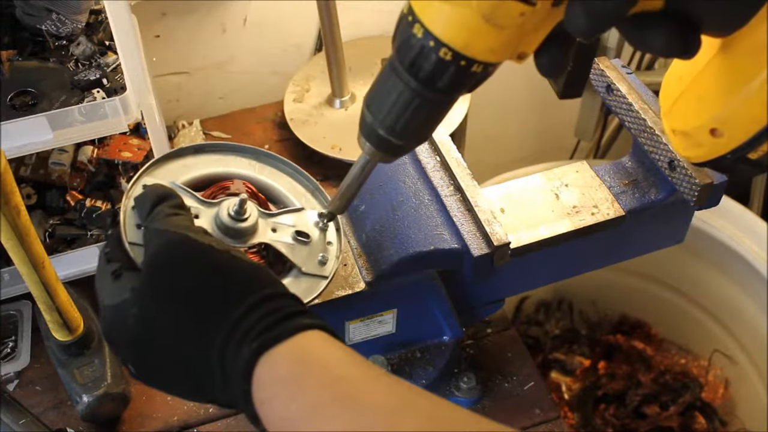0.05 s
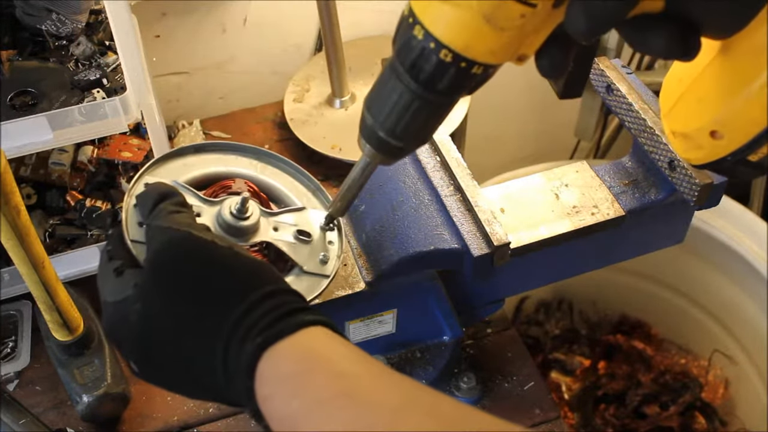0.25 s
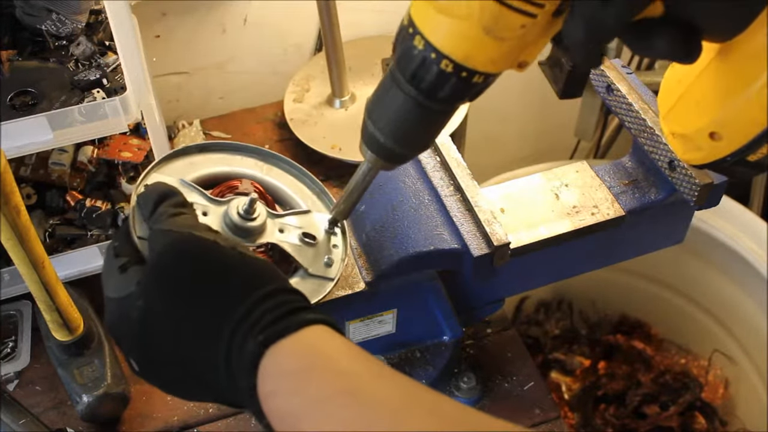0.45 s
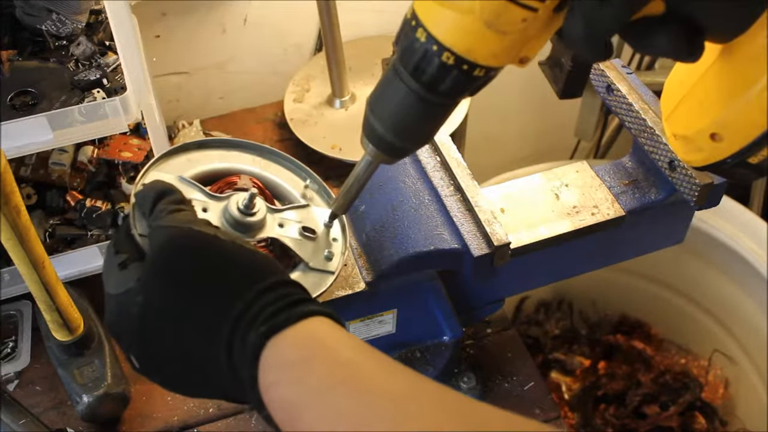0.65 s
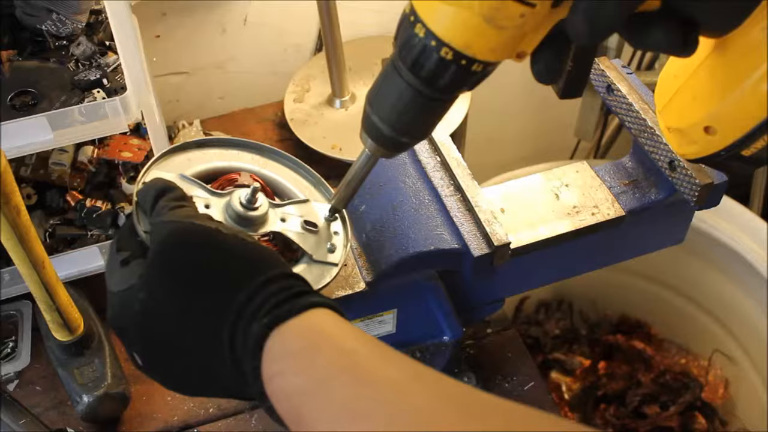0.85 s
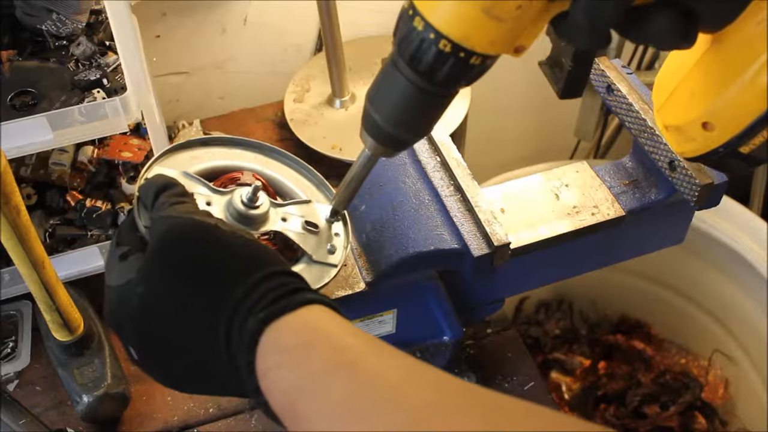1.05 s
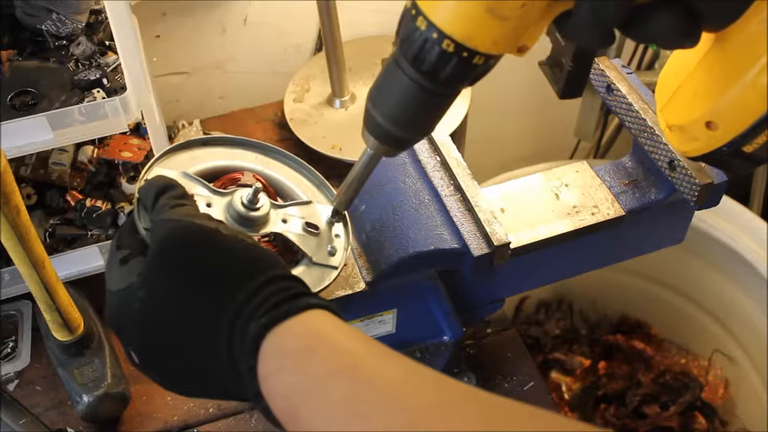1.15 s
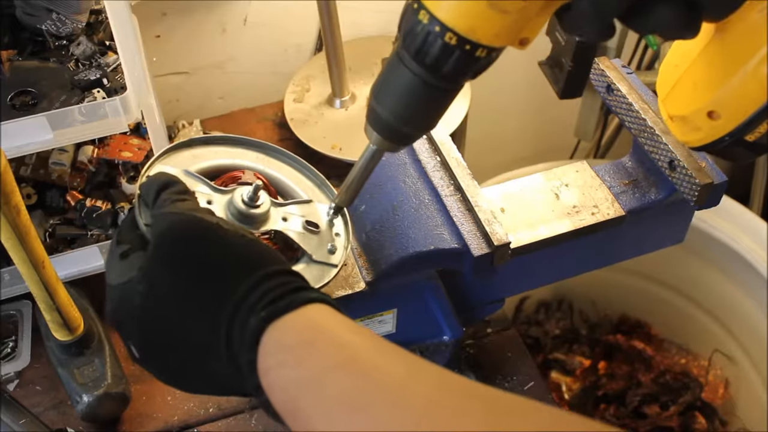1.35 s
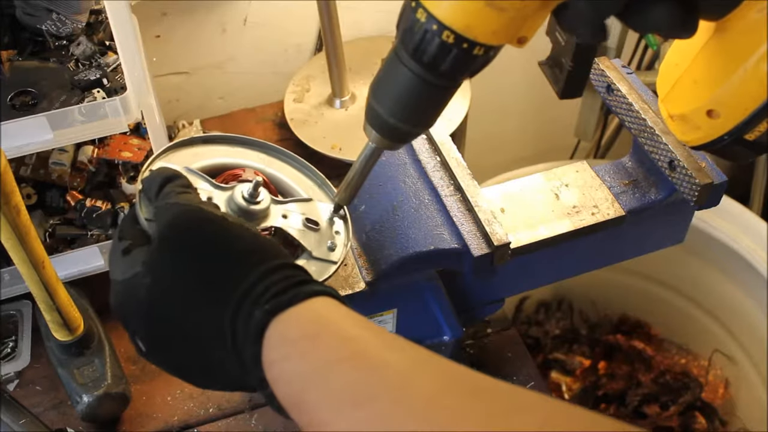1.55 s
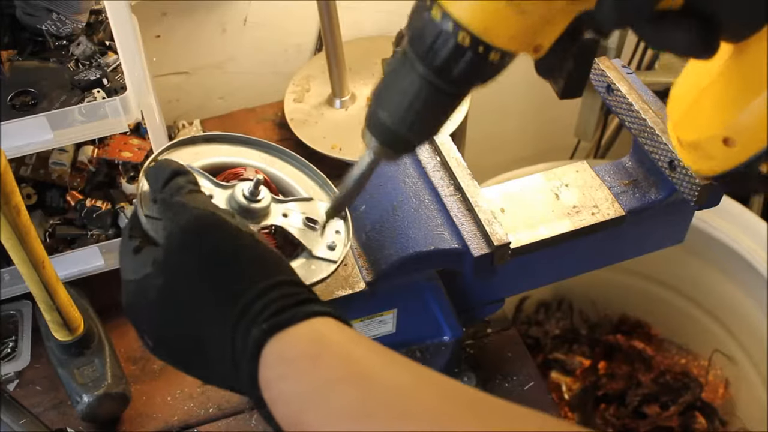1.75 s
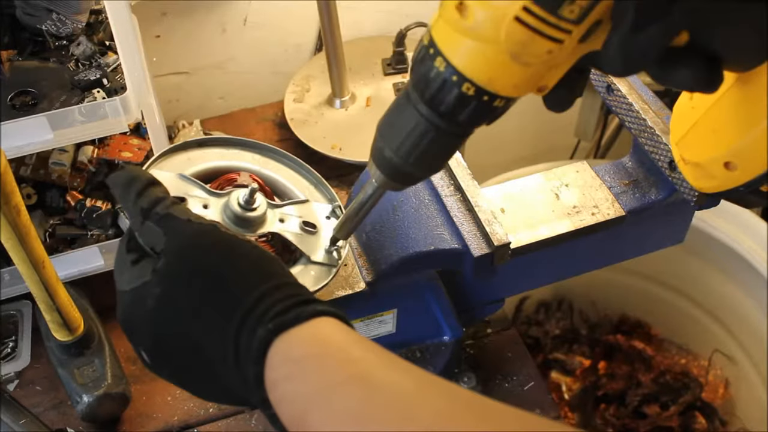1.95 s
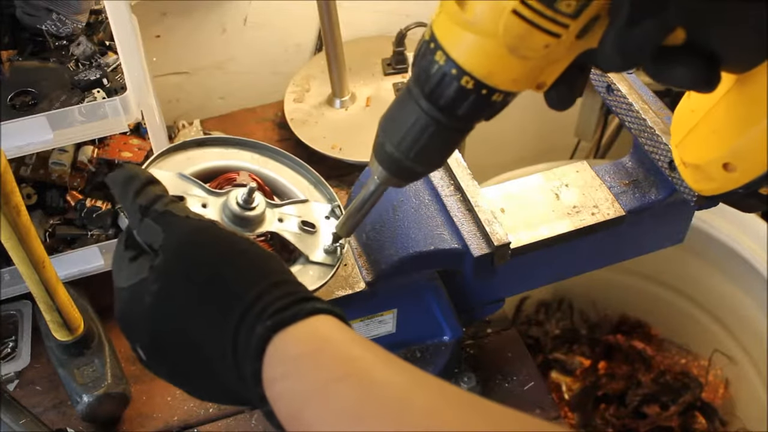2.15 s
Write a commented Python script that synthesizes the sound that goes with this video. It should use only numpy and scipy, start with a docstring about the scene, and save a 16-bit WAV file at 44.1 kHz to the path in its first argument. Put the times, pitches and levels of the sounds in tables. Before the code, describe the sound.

After a few clicks and a faint distant bird chirp, a cordless drill chatters against a screw, eases off, then spins up with a gear whine and brakes. The bit clicks and rubs on metal, close at a workbench.

```python
"""A cordless drill works on a screw in a motor housing, close by at a workbench in a small workshop.
Its gears rattle and whine; the bit scrapes and slips in the screw head about 68 times a second,
ringing the housing. The drill slows, spins up freely and brakes with a clack; the bench booms under it.
The bit clicks and rubs on the metal before and after. A distant bird chirps over a faint hum."""
import sys
import numpy as np
from scipy import signal
from scipy.fft import rfft, irfft
from scipy.io import wavfile
from scipy.ndimage import uniform_filter1d, map_coordinates

SR = 44100
rng = np.random.default_rng(int(sys.argv[2]) if len(sys.argv) > 2 else 0)


def transcribe(u):
    """Save the signal u as a 16-bit wav file named by the first command-line argument.

    u: samples, shape (n,) or (channels, n), limited to [-1, 1]; the rate is SR.
    q: integer samples, one column per channel.
    """
    v = np.clip(np.atleast_2d(u).T, -1, 1)
    q = np.round(v * 32767).astype(np.int16)
    wavfile.write(sys.argv[1], SR, q)


N = 97020


def amp(db):
    return 10 ** (np.asarray(db) / 20)


def unit(x):
    """Scale to rms 1."""
    return x / np.sqrt(np.mean(x ** 2) + 1e-20)


def clock():
    return np.arange(N) / SR


def curve(rows):
    """Linear interpolation of (time [s], value)."""
    return np.interp(clock(), *np.array(rows).T)


def gain(rows):
    """Gain from (time [s], level [dB]); zero outside the rows."""
    t = clock()
    return amp(curve(rows)) * (t > rows[0][0]) * (t < rows[-1][0])


def noise():
    return rng.standard_normal(N)


def walk(rate_hz):
    """Smooth random drift, rms 1."""
    width = max(int(SR / rate_hz), 1)
    return unit(uniform_filter1d(uniform_filter1d(noise(), width), width))


def colour(x, points):
    """Minimum-phase filter from (frequency [Hz], gain [dB]), scaled to unit noise gain."""
    size = 8192
    hz, db = np.array(points, float).T
    bin_hz = np.arange(size // 2 + 1) * SR / size
    magnitude = unit(amp(np.interp(np.log(bin_hz + 1), np.log(hz), db)))
    cepstrum = irfft(np.log(magnitude))
    cepstrum[1:size // 2] *= 2
    cepstrum[size // 2 + 1:] = 0
    return signal.fftconvolve(x, irfft(np.exp(rfft(cepstrum))))[:N]


def ring(x, modes):
    """Drive damped modes, scaled to unit noise gain."""
    t = clock()[:SR // 4]
    response = sum(amp(db) * np.sqrt(width) * np.exp(-np.pi * width * t) * np.cos(2 * np.pi * hz * t)
                   for hz, width, db in modes)
    return signal.fftconvolve(x, response / np.linalg.norm(response))[:N]


def echo(x, t60_s):
    """Diffuse reflections after a 4 ms gap."""
    t = clock()
    response = noise() * amp(-60 * t / t60_s) * (t > .004)
    return signal.fftconvolve(x, response / np.linalg.norm(response))[:N]


def blows(times, dbs, decay_s):
    """Envelope: a jump at each blow, then exponential decay."""
    kicks = np.zeros(N)
    kicks[(np.asarray(times) * SR).astype(int)] = amp(dbs) ** 2
    return np.sqrt(signal.lfilter([1], [1, -np.exp(-2 / (decay_s * SR))], kicks + 1e-18))


def strike(times, dbs, scuff_s=.0007):
    """Hard contact force: an impulse plus a brief scuff."""
    force = .5 * blows(times, dbs, scuff_s) * noise()
    force[(times * SR).astype(int)] += amp(dbs) * np.sqrt(scuff_s * SR / 2)
    return force


def scatter(pulses, spread_db):
    """Randomise pulse level and sign."""
    return pulses * amp(spread_db * np.clip(noise(), -2, 2)) * np.sign(noise())


def grit(catches_per_s=1800):
    """Friction: dense tiny catches, rms 1."""
    return unit(scatter(rng.random(N) < catches_per_s / SR, spread_db=2))


def glide(start_s, length_s, start_hz, end_hz, db, waver):
    """Wavering tone that swells, slides in pitch and fades."""
    progress = np.clip((clock() - start_s) / length_s, 0, 1)
    hz = (start_hz + (end_hz - start_hz) * progress) * (1 + waver * walk(1086))
    return amp(db) * np.sqrt(2) * np.sin(np.pi * progress) * np.sin(2 * np.pi * np.cumsum(hz) / SR)


# Workshop hush spectrum (frequency [Hz], relative gain [dB])
HUSH_COLOUR = [(30, -14), (296, 1), (404, -7.5), (2370, -8.5), (3500, -8), (4420, -11.5), (15000, -42)]


def background(hum_hz=120.3, hum_db=-59.5, hush_db=-53.5):
    """Low hum and workshop hush; both fade, the hum more."""
    fade_db = curve([(.35, 0), (2, -10)])
    hum = amp(hum_db + fade_db + .5 * walk(30)) * np.sqrt(2) * np.sin(2 * np.pi * hum_hz * clock())
    hush = amp(hush_db + fade_db / 2) * colour(noise(), HUSH_COLOUR)
    return hum + hush


# Bird chirps (time [s], length [s], start pitch [Hz], end pitch [Hz], level [dB])
BIRD_CHIRPS = [(0.115, 0.05, 5320, 4800, -49), (0.145, 0.066, 4200, 3300, -38),
               (0.167, 0.048, 4500, 4480, -38), (0.207, 0.04, 3050, 2750, -37.5),
               (0.232, .05, 3000, 3650, -40), (.355, 0.03, 3200, 3430, -43), (1.745, 0.07, 5490, 4350, -53),
               (1.808, 0.03, 3150, 3400, -49)]


def bird(flutter_db=3.5):
    """Short, rough, fluttering glides, smeared by distance."""
    song = sum(glide(*chirp, waver=.033) for chirp in BIRD_CHIRPS) * amp(flutter_db * walk(180))
    return song + echo(song, t60_s=.7)


# Bench vibration (time [s], level [dB])
BENCH_LEVEL = [(.46, -71), (.5, -46), (.63, -54.5), (.72, -40), (.785, -54), (.9, -43), (1.03, -53.5),
               (1.37, -54), (1.64, -55), (1.69, -78)]
# Bench modes (frequency [Hz], width [Hz], relative level [dB])
BENCH_RESONANCES = [(151.7, 12.5, 6.5), (266, 18, 2)]


def bench(band_hz=(63.5, 380)):
    """Drill vibration booms in the low modes of the bench."""
    band = signal.butter(3, band_hz, "bandpass", fs=SR, output="sos")
    boom = signal.sosfilt(band, ring(noise(), BENCH_RESONANCES))
    return unit(boom) * gain(BENCH_LEVEL)


# Rubbing strokes (time [s], length [s], level [dB])
RUB_STROKES = [(0.047, 0.45, -55.5), (1.865, 0.15, -47), (1.972, 0.25, -55.5)]
# Metal contact spectrum, also for slips (frequency [Hz], relative gain [dB])
CONTACT_COLOUR = [(400, -5.5), (2500, -6), (11000, -1), (16000, 0)]
# Housing modes, also for taps and slips (frequency [Hz], width [Hz], relative level [dB])
HOUSING_MODES = [(507, 23, -9), (1000, 53, -12.5), (1457, 75, 4), (1700, 48, 0), (2800, 170, 4.5),
                 (3070, 71, 1)]


def handling(flutter_db=3.9):
    """Gloves and bit rub the housing and ring it; the sliding bit squeaks once."""
    strokes = sum(amp(db) * np.sin(np.pi * np.clip((clock() - start_s) / length_s, 0, 1))
                  for start_s, length_s, db in RUB_STROKES)
    rub = grit() * strokes * amp(flutter_db * walk(68))
    squeak = glide(start_s=1.88, length_s=.11, start_hz=1620, end_hz=1820, db=-47, waver=.031)
    return colour(rub, CONTACT_COLOUR) + amp(-5) * ring(rub, HOUSING_MODES) + squeak


# Bit taps (time [s], force level [dB], contact cutoff [Hz])
BIT_TAPS = [(0.0932, -25, 2100), (1.4115, -17.5, 2000), (1.5165, -15, 2000), (2.1715, -25.5, 3600)]


def taps():
    """The bit taps the housing; softer contact drives the high modes less."""
    force = 0
    for time_s, db, cutoff_hz in BIT_TAPS:
        contact = strike(np.array([time_s]), np.array([db]))
        force += signal.lfilter(*signal.butter(2, cutoff_hz, fs=SR), contact)
    return ring(force, HOUSING_MODES)


def burst(times, dbs, spectrum, decay_s):
    """Impact noise: fast decay plus a short rattling tail."""
    tail = blows(times, dbs - 15, decay_s=.01)
    envelope = np.hypot(blows(times, dbs, decay_s), tail)
    return colour(envelope * noise(), spectrum)


# Knocks of bit, trigger and chuck (time [s], snap level [dB], body level [dB])
KNOCKS = [(0.0651, -26.5, -55), (0.285, -22, -36.5), (0.4605, -20, -21), (0.9996, -44, -27),
          (1.008, -19, -22), (1.6616, -15.5, -21.5), (1.8385, -25, -31.5), (1.842, -25, -29),
          (1.936, -20.5, -34.5), (1.948, -22, -36.5), (2.1729, -27, -35)]
# Bumps into the bench (time [s], level [dB])
BUMPS = [(1.006, -33), (1.412, -37.5), (1.468, -39), (1.523, -40), (1.577, -40), (1.842, -36.5)]
# Snap, body and bump spectra (frequency [Hz], relative gain [dB])
KNOCK_SNAP_COLOUR = [(500, -10), (2500, -19), (8500, -1.5), (15000, 0.5)]
KNOCK_BODY_COLOUR = [(200, -46.5), (500, -3), (850, -10), (1400, 1.5), (2100, -8), (4500, -4),
                     (7000, -20.5), (15000, -65)]
BUMP_COLOUR = [(35, -34), (75, -11), (150, 7), (205, -10), (285, 6), (420, -9), (4000, -40)]


def knocks():
    """Bit, trigger and chuck knock with a bright snap and hollow body; bumps thud through the bench."""
    times, snap_db, body_db = np.array(KNOCKS).T
    snap = burst(times, snap_db, KNOCK_SNAP_COLOUR, decay_s=.004)
    body = burst(times, body_db, KNOCK_BODY_COLOUR, decay_s=.0041)
    thud = burst(*np.array(BUMPS).T, BUMP_COLOUR, decay_s=.02)
    return snap + body + thud


# Scrape envelope (time [s], level [dB])
SCRAPE_LEVEL = [(.455, -37.5), (.5, -28), (.62, -33.5), (.87, -30.5), (.915, -44), (.99, -43.5),
                (1.11, -37.5), (1.62, -45), (1.72, -53)]
# Scrape spectrum (frequency [Hz], relative gain [dB])
FRICTION_COLOUR = [(120, -43.5), (200, -13), (277, -8.5), (680, -5), (1070, -2), (1470, 0.5), (2860, -3),
                   (6000, -10.5), (9000, -68)]
# Slot jumps (time [s], relative crack level [dB], relative ring level [dB])
BIT_SLIPS = [(.4777, -15.5, -22), (.514, -15, -23), (.5216, -21, -29), (.5405, -21, -15),
             (.561, -18.5, -18.5), (.578, -15, -17), (.5945, -20, -17.5), (.609, -26, -24),
             (.626, -21, -21), (.642, -17.5, -23.5), (.658, -19.5, -22.5), (.687, -19.5, -19.5),
             (.7, -20, -28), (.7156, -19.5, -16.5), (.731, -29, -22.5), (.7438, -17, -22), (.759, -22, -29),
             (.772, -31, -21.5), (.786, -17.5, -25), (.8, -23, -23.5), (.8135, -19, -18.5),
             (.8285, -23, -31), (.8435, -17.5, -21.5), (.876, -21.5, -19.5), (1.012, -25, -21.5)]


def bit():
    """The bit scrapes in the screw head and jumps slots; each jump ticks, cracks and rings the housing."""
    scrape = colour(grit() * gain(SCRAPE_LEVEL), FRICTION_COLOUR)
    times, crack_db, ring_db = np.array(BIT_SLIPS).T
    tick = blows(times, crack_db - 2.5, decay_s=.00076)
    crack = np.hypot(tick, blows(times, crack_db, decay_s=.0054)) * noise()
    housing = ring(strike(times, ring_db + 6.5), HOUSING_MODES)
    return scrape + housing + colour(crack, CONTACT_COLOUR)


# Gear rattle spectrum (frequency [Hz], relative gain [dB])
RATTLE_COLOUR = [(150, -33), (278, -23), (668, -20.5), (1100, -15), (1330, -2), (1680, -6.5), (1950, -9.5),
                 (3050, -8.5), (3480, -4), (4300, -5), (4720, -1), (5150, -8.5), (5650, -6.5), (6400, -1),
                 (8950, -3.5), (9650, .5), (12500, -5), (15800, -7)]


def gear_rattle(turns, teeth=12, cycle_turns=4, turn_depth=.16, flutter_db=1):
    """Gear teeth clatter, partly at random, partly in a repeating wear pattern."""
    impacts = scatter(np.diff(np.floor(turns * teeth), prepend=0), spread_db=5.5)
    wear = rng.standard_normal(560)
    pattern = map_coordinates(wear, [turns / cycle_turns % 1 * len(wear)], mode="grid-wrap")
    surge = (1 + turn_depth * np.cos(2 * np.pi * turns)) * amp(flutter_db * walk(170))
    clatter = unit(unit(impacts) + .53 * noise())
    return colour(unit((clatter + 1.05 * pattern) * surge), RATTLE_COLOUR)


# Gear throb and whines (order [x motor speed], relative level [dB], peak at [rev/s], spread [rev/s])
GEAR_ORDERS = [(.25, -24.5, 276, 14), (4, -17, 338, 14), (5, -13, 301, 11), (10.1, -16.5, 342, 3.5),
               (16.85, -18.5, 353, 7), (20, -8.5, 331, 7.5), (20, -11, 354, 2.5), (20, -12, 220, 38)]


def gear_whine(speed_rps, turns, flutter_db=2.5):
    """Gear tones swell as the speed passes resonances of the case."""
    whine = 0
    for order, db, peak_rps, spread_rps in GEAR_ORDERS:
        resonance = np.exp(-.5 * ((speed_rps - peak_rps) / spread_rps) ** 2)
        tone = np.sqrt(2) * np.sin(2 * np.pi * order * turns)
        whine += amp(db + flutter_db * walk(44)) * resonance * tone
    return whine


# Motor speed (time [s], speed [rev/s])
MOTOR_SPEED = [(.45, 235), (.62, 275), (.88, 280), (.96, 130), (1.01, 165), (1.1, 298), (1.19, 325),
               (1.28, 338), (1.42, 347.5), (1.61, 354), (1.657, 344), (1.7, 90)]
# Gear envelope (time [s], level [dB])
GEAR_LEVEL = [(.455, -86), (.485, -28.5), (.55, -26.5), (.62, -31), (.88, -32), (.912, -43.5), (.995, -40),
              (1.012, -27.5), (1.12, -24), (1.66, -25.5), (1.675, -39), (1.72, -76)]


def drill(wobble=.0004):
    """The motor drives the gears; rattle and whine follow its rotation."""
    speed_rps = curve(MOTOR_SPEED) * (1 + wobble * walk(60))
    turns = np.cumsum(speed_rps) / SR
    return (gear_rattle(turns) + amp(2.5) * gear_whine(speed_rps, turns)) * gain(GEAR_LEVEL)


def scene():
    """Mono mix: close sources with room reflections, plus bench, bird and background."""
    near = drill() + bit() + knocks() + taps() + handling()
    room = amp(-11) * echo(near, t60_s=.25)
    return (near + room + bench() + bird() + background())[None]


def record(dry):
    """Steep low-pass at 15.75 kHz."""
    return signal.sosfilt(signal.ellip(10, .2, 80, 15750, fs=SR, output="sos"), dry)


dry = scene()
out = record(dry)
transcribe(out)
```